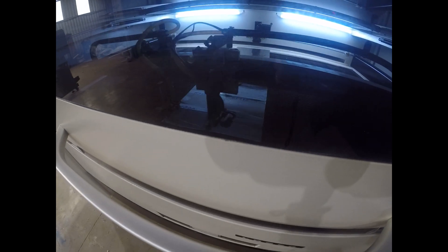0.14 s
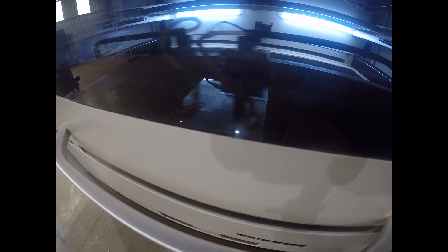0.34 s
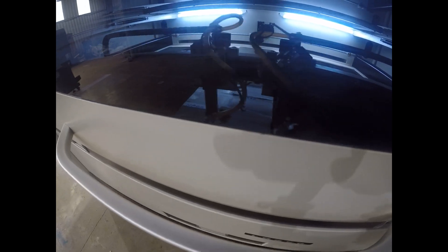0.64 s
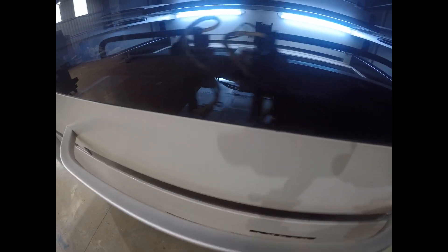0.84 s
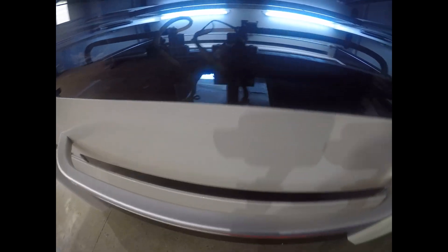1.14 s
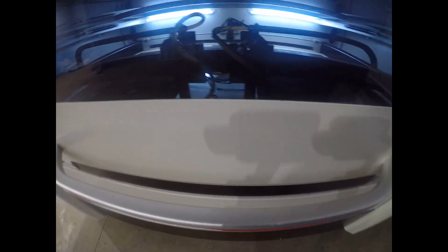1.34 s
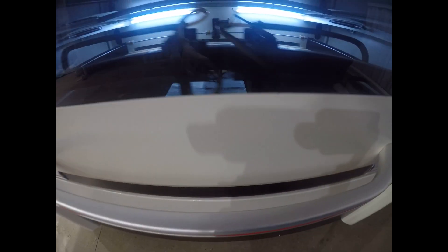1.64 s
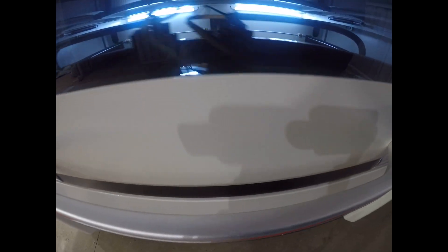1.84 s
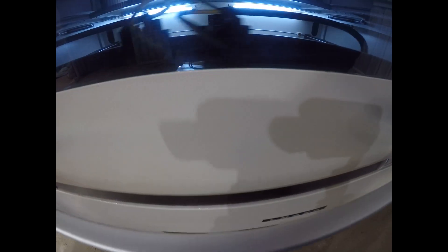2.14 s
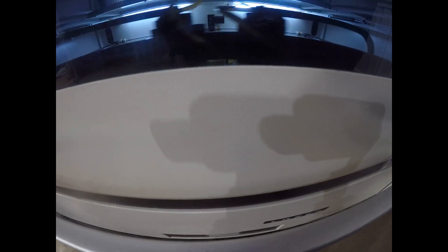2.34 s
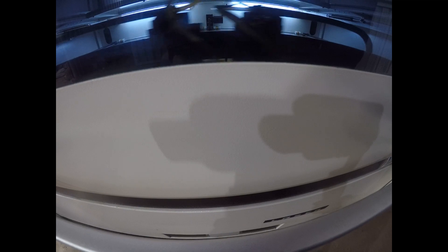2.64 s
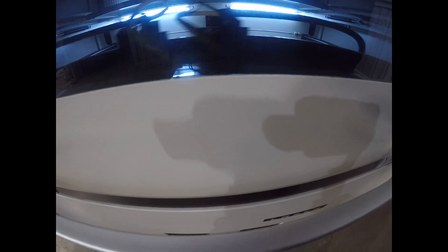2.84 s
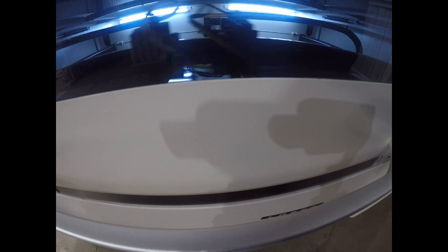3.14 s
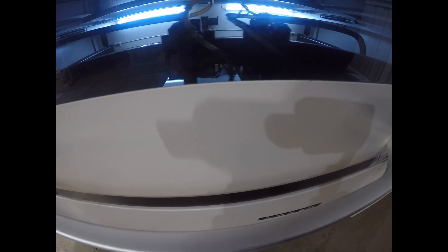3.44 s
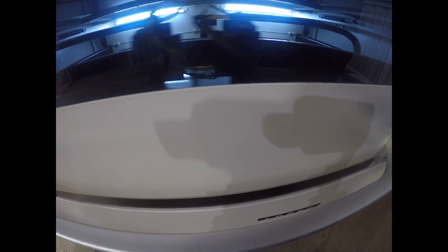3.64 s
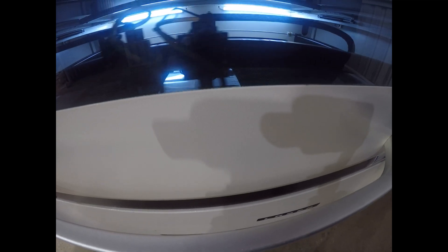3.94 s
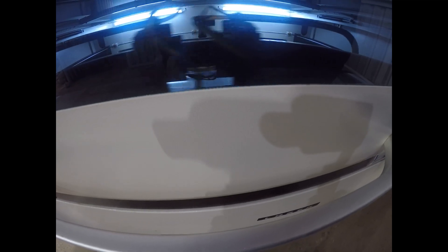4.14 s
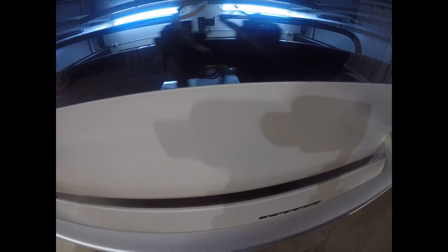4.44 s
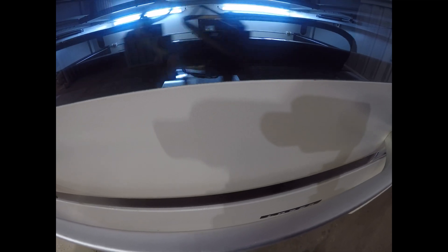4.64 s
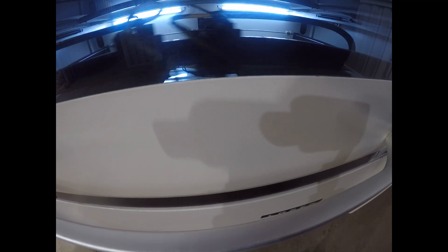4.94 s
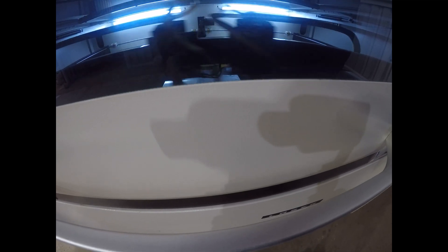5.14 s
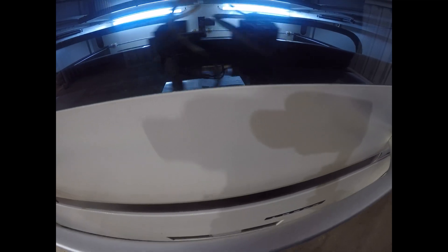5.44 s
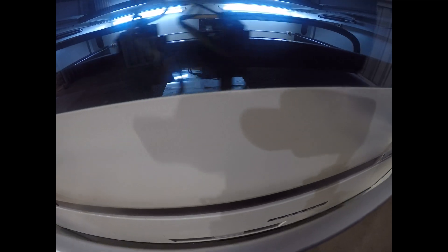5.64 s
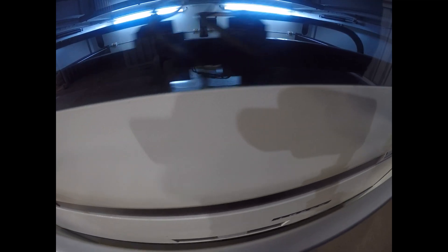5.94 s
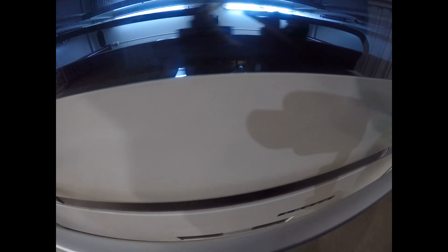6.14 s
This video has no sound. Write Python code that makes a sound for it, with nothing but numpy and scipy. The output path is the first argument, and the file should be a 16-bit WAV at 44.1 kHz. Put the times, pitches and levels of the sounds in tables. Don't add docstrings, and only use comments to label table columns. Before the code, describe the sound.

Closed engraving machine runs steadily: low buzzing hum, faint hiss pulsing in short bursts, tiny crackles, a single air blow-off, and knocking creaks near the end.

```python
import sys
import numpy as np
from scipy import signal
from scipy.fft import rfft, irfft
from scipy.io import wavfile

SR = 44100
rng = np.random.default_rng(int(sys.argv[2]) if len(sys.argv) > 2 else 0)


def boost_factor(decibels):
    exponent = np.asarray(decibels, float) / 20
    return 10 ** exponent


def dump(signal):
    limited = np.clip(np.atleast_2d(signal).T, -1, 1)
    pcm = np.round(limited * 32767).astype(np.int16)
    wavfile.write(sys.argv[1], SR, pcm)


N = 278182
TIME = np.arange(N) / SR
FREQ = np.maximum(np.arange(N // 2 + 1) * SR / N, 1)


def level(x, db):
    return x * boost_factor(db) / np.sqrt(np.mean(x ** 2))


def colour(x, points):
    hz, db = np.transpose(points)
    gain = boost_factor(np.interp(np.log(FREQ), np.log(hz), db, -90, -90))
    return level(irfft(rfft(x) * gain, N), 0)


def noise():
    return rng.standard_normal(N)


def walk(rate_hz):
    return level(irfft(rfft(noise()) * np.exp(-(FREQ / rate_hz) ** 2), N), 0)


def swell(middle_s, length_s):
    return np.exp(-(2 * (TIME - middle_s) / length_s) ** 2)


def envelope(start_s, hold_s, rise_db_per_s, fall_db_per_s):
    before_s = np.maximum(start_s - TIME, 0)
    after_s = np.maximum(TIME - start_s - hold_s, 0)
    return boost_factor(np.maximum(-rise_db_per_s * before_s - fall_db_per_s * after_s, -120))


MAINS_HZ = 60.025
# multiple, level_db
PUMP_HARMONICS = [(1, -30.5), (2, -37), (3, -31), (5, -64), (6, -62.5), (8, -73)]
# multiple, resting_db
WAVERING_HARMONICS = [(4, -52.5), (7, -65)]
# multiple, middle_s, length_s, swell_db
COMPRESSOR_SWELLS = [(4, 0.73, 0.16, 8.5), (4, 1.6, 0.58, 3.5), (4, 2.39, .4, 8), (4, 3.12, 0.26, 8),
                     (4, 3.7, 0.32, 10.5), (4, 4.37, 0.67, 12.5), (4, 5.53, 0.13, 11), (4, 6.0, 0.29, 11),
                     (7, 0.83, 0.48, 6.5), (7, 3.38, 0.74, 9.5), (7, 5.93, 0.27, 10)]


def pump():
    turn = 2 * np.pi * MAINS_HZ * TIME + np.pi
    drone = np.zeros(N)
    for k, db in PUMP_HARMONICS:
        drone -= np.sqrt(2) * boost_factor(db + 0.2 * walk(0.93)) * np.cos(k * turn)
    for k, db in WAVERING_HARMONICS:
        swell_db = sum(up_db * swell(middle_s, length_s)
                       for m, middle_s, length_s, up_db in COMPRESSOR_SWELLS if round(m) == round(k))
        gain = np.sqrt(2) * boost_factor(db + swell_db + 1.2 * walk(2.1))
        drone -= gain * np.cos(k * turn + 0.88 * walk(0.45))
    strokes = np.diff(np.floor(turn / (2 * np.pi)), prepend=0) * boost_factor(1.3 * noise())
    reed = colour(strokes, [(2600, -37), (3450, 4.0), (4100, 3.5), (5000, -9), (6000, 3.0), (6900, -8), (7800, -22)])
    cabinet = noise()[:SR // 30] * np.exp(-TIME[:SR // 30] / 0.022)
    return drone + level(signal.fftconvolve(reed, cabinet)[:N], -62)


# pitch_hz, width_hz, level_db
BLOWER_TONES = [(55, 3.7, -40), (64.47, 3, -42.5), (75.6, 2.7, -42.5), (98.8, 8.8, -46), (156.5, 9, -44.5),
                (172.2, 3.4, -45), (189.06, 1.5, -43), (224, 9, -51.5), (323.7, 4., -66.5),
                (382, 2.7, -60.5), (437, 0.42, -72.5), (483.7, 7.8, -67), (2277, 5.2, -73)]
# freq_hz, density_db_per_hz
BLOWER_RUMBLE = [(3, 4), (11, -3), (16, 5), (35, -5.5), (62, 3.5), (105, -1.5), (135, -9.5), (170, -4),
                 (205, -10.5), (290, -14), (420, -24), (520, -31), (700, -76)]
# middle_s, length_s, swell_db
BLOWER_SURGES = [
    (2.63, .25, 0),
    (5.425, 0.2, 6),
    (6.2, 0.23, 2),
]
GUST_DB, GUST_RATE_HZ = 1.5, 8


def blower():
    tones = np.zeros(N)
    for hz, width_hz, db in BLOWER_TONES:
        tones += level(irfft(rfft(noise()) / (1 + (2 * (FREQ - hz) / width_hz) ** 2), N), db)
    flow = rfft(level(colour(noise(), BLOWER_RUMBLE), -33) + tones)
    deep = 1 / (1 + (FREQ / 110) ** 8)
    surge_db = sum(db * swell(middle_s, length_s) for middle_s, length_s, db in BLOWER_SURGES)
    gusts = boost_factor(surge_db + GUST_DB * walk(GUST_RATE_HZ) + 0.06)
    return irfft(flow * deep, N) * gusts + irfft(flow * (1 - deep), N)


# freq_hz, density_db_per_hz
ROOM_AIR = [(350, -7), (750, 2), (1500, 0), (4000, -9), (6600, -5.5), (8800, -8), (9750, -4.5),
            (10300, -15), (11350, -11.5), (11900, -23), (13100, -14), (13600, -24), (14300, -20),
            (15400, -39)]
# freq_hz, density_db_per_hz
MIC_PORT = [(9100, -20), (9400, -3), (9580, -7), (9780, 0), (9950, -9), (10300, -19)]


def air():
    port = colour(noise(), MIC_PORT) * boost_factor(0.65 * walk(7.8))
    hiss = colour(noise(), ROOM_AIR) * boost_factor(0.73 * walk(24.0))
    return level(hiss, -50.0) + level(port, -61.5)


ROUND_S = 0.95
# start_in_round_s, length_s, from_hz, to_hz, level_db
CARRIAGE_STROKES = [
    (0.22, 0.3, 153, 180, -41),
    (0.83, 0.43, 190, 163, -46.5),
    (.7, 0.38, 187, 192, -53),
    (.78, 0.19, 79.5, 80.4, -40),
    (0.38, 0.17, 79, 86, -41),
    (.2, 0.11, 85, 82.6, -48),
]


def carriage():
    out = np.zeros(N)
    for start_s, length_s, from_hz, to_hz, db in CARRIAGE_STROKES:
        rounds, age_s = np.divmod(TIME - start_s + ROUND_S, ROUND_S)
        luck = rng.standard_normal((9, 2))[rounds.astype(int)]
        mean_hz = from_hz + (to_hz - from_hz) * age_s / length_s / 2
        turn = 2 * np.pi * age_s * mean_hz + np.pi * luck[:, 0]
        arch = np.sin(np.pi * np.clip(age_s / length_s, 0, 1))
        out += np.sqrt(2) * boost_factor(db + 1.4 * luck[:, 1]) * arch * np.sin(turn)
    return out


# pitch_hz, level_db
SUPPLY_WHINES = [(1000, -64.5), (1905, -70)]


def supply_whines():
    out = np.zeros(N)
    for hz, db in SUPPLY_WHINES:
        gain = np.sqrt(2) * boost_factor(db + 2.8 * walk(2.1))
        out += gain * np.sin(2 * np.pi * hz * TIME + 0.16 * walk(2.4))
    return out


def sizzle(count=900):
    out = np.zeros(N + 1024)
    age_s = TIME[:1024]
    for when, pitch, size in rng.random((count, 3)):
        start = int(when * N)
        ping = np.exp(-age_s / 0.0033) * np.sin(2 * np.pi * (5200 + 3800 * pitch) * age_s)
        out[start:start + 1024] += boost_factor(4.5 * size) * age_s * ping
    return level(out[:N], 0)


JET_IDLE_DB, IDLE_WHISTLE_DB = -57, -12
FLARE_RISE_DB_PER_S, FLARE_FALL_DB_PER_S = 502, 119
# start_s, hold_s, hiss_db, whistle_rel_db
JET_FLARES = [(0.017, 0.026, -50.5, -3), (0.264, 0.04, -48, -9), (0.405, .1, -48.5, -1),
              (0.738, .05, -46, -6), (0.905, .03, -51, -6), (1.248, 0.047, -42, 3), (1.362, .05, -48, 0),
              (1.696, 0.046, -46, 2.5), (1.804, 0.14, -51.5, -4), (2.134, .04, -50, -7),
              (2.242, .04, -49, -16), (2.3, 0.053, -45.5, -12), (2.605, 0.12, -46.5, -9),
              (2.78, 0.1, -51.5, -3.5), (3.073, 0.044, -49.5, -4), (3.178, .04, -47.5, -14),
              (3.243, 0.032, -44.5, -8), (3.53, 0.026, -48.5, -10), (3.585, 0.021, -44.5, -4.5),
              (3.68, .07, -52.5, -10), (4.005, 0.045, -50, -11), (4.105, .01, -48.5, -5),
              (4.178, 0.051, -45, -9), (4.477, 0.12, -47.5, -10), (4.98, 0.095, -48.5, -10),
              (5.105, 0.084, -45.5, -10), (5.26, .17, -48, -9), (5.465, 0.033, -45, -13),
              (5.86, .07, -48.5, -12), (6.038, 0.068, -45, -9)]


def flares():
    hiss, whistle = boost_factor(2 * JET_IDLE_DB), boost_factor(2 * (JET_IDLE_DB + IDLE_WHISTLE_DB))
    for start_s, hold_s, db, whistle_db in JET_FLARES:
        power = (boost_factor(db) * envelope(start_s, hold_s, FLARE_RISE_DB_PER_S, FLARE_FALL_DB_PER_S)) ** 2
        hiss = hiss + power
        whistle = whistle + power * boost_factor(2 * whistle_db)
    return np.sqrt(hiss), np.sqrt(whistle)


VALVE_OPENS_S, VALVE_SHUTS_S, VALVE_RINGS_TO_S, VALVE_HOLD_S = 1.2465, 1.324, 1.9, 0.051


def valve_open():
    corners_s = [VALVE_OPENS_S - .04, VALVE_OPENS_S - .03, VALVE_RINGS_TO_S, VALVE_RINGS_TO_S + .1]
    return np.interp(TIME, corners_s, [0, 1, 1, 0])


# freq_hz, density_db_per_hz
HISS_SPECTRUM = [(2000, -20.5), (4500, -15.5), (5800, -5.5), (7000, 1.5), (8200, -4), (10000, -9),
                 (13000, -29.5), (15400, -28)]
# freq_hz, density_db_per_hz
CAVITY_SPECTRUM = [(2600, -9), (3250, -14), (3500, 2.5), (3900, -2.5), (4500, -17)]
EDDY_BANDS_HZ = (4300, 5000, 5500, 5900, 6250, 6600, 6950, 7300, 7650, 8000, 8500, 9200, 10500, 13000)


def jet():
    spit = boost_factor(0.46 * walk(29.0) + 1.34 * walk(260.0))
    spectrum = rfft(colour(noise() * spit, HISS_SPECTRUM))
    hiss = np.zeros(N)
    for row in np.eye(len(EDDY_BANDS_HZ)):
        share = np.interp(FREQ, EDDY_BANDS_HZ, row)
        hiss += irfft(spectrum * share, N) * boost_factor(2.6 * walk(22.0))
    cavity = colour(noise() * spit * boost_factor(2.5 * walk(45.)), CAVITY_SPECTRUM)
    cavity *= boost_factor(-5.5 - 5.2 * valve_open())
    blow, whistle = flares()
    return blow * (boost_factor(-3.0) * hiss + boost_factor(-15.0) * sizzle()) + whistle * cavity


# freq_hz, density_db_per_hz
SHELL_CRACK = [(2800, -9), (3800, -2), (5000, -2), (6800, -1), (11000, -22), (15000, -27)]


def cracks(events):
    crack = colour(noise(), SHELL_CRACK)
    knock = colour(noise(), [(200, 12), (450, -7), (800, -3), (1000, 1), (1500, -19)])
    out = np.zeros(N)
    for start_s, peak_db, ring_hz, knock_db, t60_s in events:
        age_s = TIME - start_s
        ring = boost_factor(-0.5) * np.sin(2 * np.pi * ring_hz * age_s)
        decay = (age_s > 0) * boost_factor(peak_db - 9.5 - 60 * np.abs(age_s) / max(t60_s, .004))
        out += decay * (crack + ring + boost_factor(knock_db - 8.0) * knock)
    return out


# start_s, peak_db, ring_hz, knock_rel_db, t60_s
MOUNT_CREAKS = [
    (0.3564, -47, 3850, 0, 0.02),
    (0.9693, -33.5, 3580, -9, 0.026),
    (1.718, -32, 5200, 2, 0.015),
    (5.043, -39, 3590, 4, 0.015),
    (5.849, -44, 4000, 23, 0.039),
    (5.8574, -33, 3730, 8, 0.038),
    (5.8697, -32.5, 4000, 18, 0.032),
    (5.874, -33, 3570, 6, 0.02),
    (5.998, -28.5, 4940, 7, 0.024),
]


def creaks():
    return cracks(MOUNT_CREAKS)


# start_s, peak_db, ring_hz
CUT_SPITS = [(0.799, -36, 3650), (0.9294, -42, 3530), (1.1994, -36.5, 3460), (1.9094, -39, 3790),
             (2.2477, -41, 3820), (2.8394, -38.5, 3500), (3.0689, -35, 3540), (3.1194, -40, 3550),
             (3.5322, -43, 3560), (3.6676, -38, 3660), (3.7295, -39, 3450), (4.6084, -38, 3530),
             (4.9394, -41, 3540)]
SPIT_DB, SPIT_KNOCK_DB, SPIT_T60_S = 0, -14, 0.034


def spits():
    return cracks([(start_s, db + SPIT_DB, hz, SPIT_KNOCK_DB, SPIT_T60_S) for start_s, db, hz in CUT_SPITS])


VALVE_DB, VALVE_RISE_DB_PER_S, VALVE_SAG_DB_PER_S, VALVE_SHUT_DB_PER_S = -37.5, 2400, 90, 260
VALVE_ROOM_DB, VALVE_ROOM_DB_PER_S = -45, 55
THROAT_DB, THROAT_RISE_DB_PER_S, THROAT_FALL_DB_PER_S = -44, 150, 500
# freq_hz, density_db_per_hz
VALVE_BURST = [(590, -43), (1000, -11), (1100, -12), (1200, -3), (1500, -2.5), (1770, -9), (1910, -6.5),
               (2930, -4), (3790, -4), (5600, -6), (7280, -7.5), (12300, -120)]


def valve():
    burst = colour(noise() * boost_factor(0.84 * walk(120.)), VALVE_BURST) * boost_factor(2.5)
    throat = colour(noise(), [(250, -13), (500, -8), (750, -0.5), (950, -2), (1150, -4)])
    seat = colour(noise(), [(1300, -4), (1550, -10.0), (1900, -8), (2250, 0), (2600, -15)])
    seat *= np.exp(-((TIME - 1.258) / 0.029) ** 2)
    opened = envelope(VALVE_OPENS_S, VALVE_HOLD_S, VALVE_RISE_DB_PER_S, VALVE_SAG_DB_PER_S)
    blow = boost_factor(VALVE_DB) * opened * envelope(0, VALVE_SHUTS_S, 0, VALVE_SHUT_DB_PER_S)
    open_s = VALVE_SHUTS_S - VALVE_OPENS_S
    ring = boost_factor(VALVE_ROOM_DB) * envelope(VALVE_OPENS_S, open_s, VALVE_RISE_DB_PER_S, VALVE_ROOM_DB_PER_S)
    late = boost_factor(THROAT_DB) * envelope(VALVE_SHUTS_S, 0, THROAT_RISE_DB_PER_S, THROAT_FALL_DB_PER_S)
    late *= TIME > VALVE_OPENS_S
    return np.hypot(blow, ring) * (burst + boost_factor(-6.0) * seat) + (late + boost_factor(-18.0) * ring) * throat


# start_s, length_s, pitch_hz, level_db
CARRIAGE_SQUEAKS = [
    (1.46, .13, 1630, -55),
    (1.67, .3, 1905, -64),
]


def squeaks():
    out = np.zeros(N)
    for start_s, length_s, hz, db in CARRIAGE_SQUEAKS:
        fade = np.clip(np.minimum(TIME - start_s, start_s + length_s - TIME) / .02, 0, 1)
        out += boost_factor(db + 3 * walk(40.)) * fade * np.sin(2 * np.pi * hz * TIME + 1.1 * walk(30.))
    return out


SWEEP_S, SWEEP_HOLD_S, SWEEP_DB, SWEEP_RISE_DB_PER_S, SWEEP_FALL_DB_PER_S = 5.19, 0.16, -51.5, 60, 60
# freq_hz, density_db_per_hz
GRID_ROAR = [(1800, -17), (2700, -1), (3600, -7), (5000, 1), (6200, -4), (7500, -37)]


def jet_sweep():
    gain = boost_factor(SWEEP_DB) * envelope(SWEEP_S, SWEEP_HOLD_S, SWEEP_RISE_DB_PER_S, SWEEP_FALL_DB_PER_S)
    return gain * colour(noise(), GRID_ROAR)


def scene():
    machine = pump() + blower() + air() + carriage() + supply_whines()
    work = jet() + spits() + jet_sweep()
    return (machine + work + creaks() + valve() + squeaks())[None]


def band_limit(x):
    return signal.sosfilt(signal.butter(12, 15170, fs=SR, output="sos"), x)


# centre_hz, width_hz, depth_db
HOUSING_NOTCHES = [(561, 65, 10.5), (1105, 161, 10.5), (1940, 36, 8)]


def record(dry):
    dry = dry * np.sin(np.pi / 2 * np.clip((TIME[-1] - TIME) / .008, 0, 1))
    freq_hz = np.arange(N + 1) * SR / (2 * N)
    dips_db = sum(-depth_db * np.exp(-((freq_hz - hz) / width_hz) ** 2) for hz, width_hz, depth_db in HOUSING_NOTCHES)
    mirrored = np.hstack([dry, dry[:, ::-1]])
    housed = irfft(rfft(mirrored) * boost_factor(dips_db))[:, :N]
    return band_limit(housed)


dry = scene()
out = record(dry)
dump(out)
```